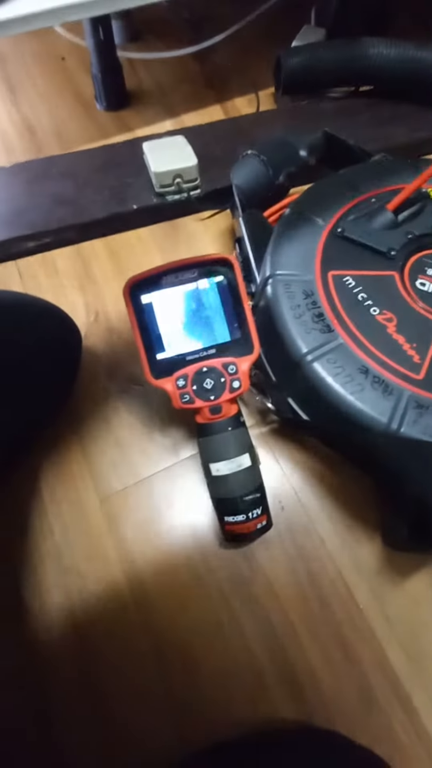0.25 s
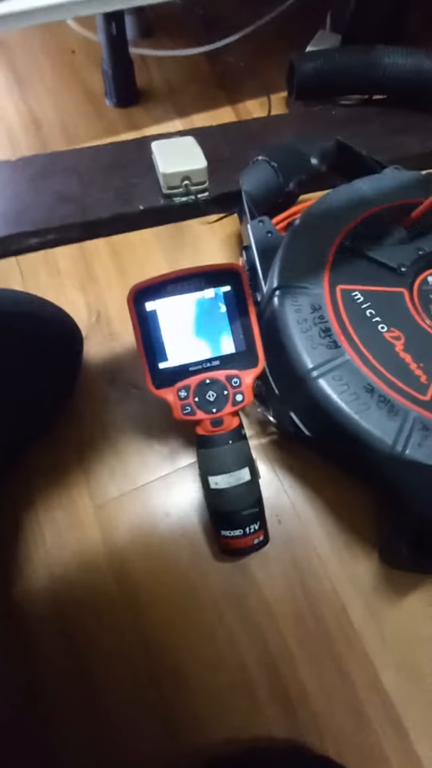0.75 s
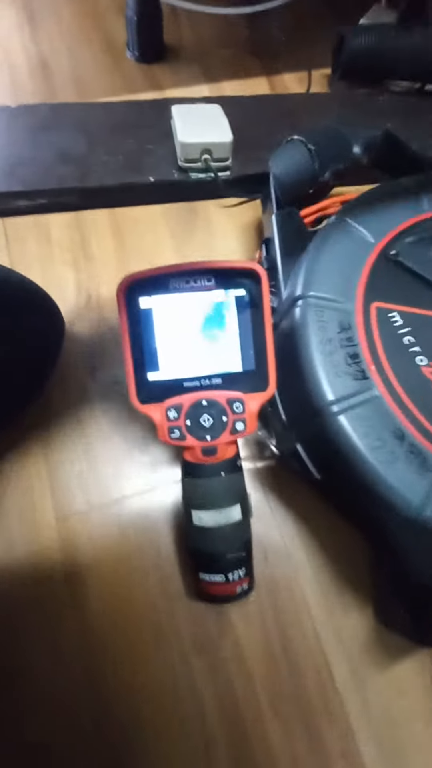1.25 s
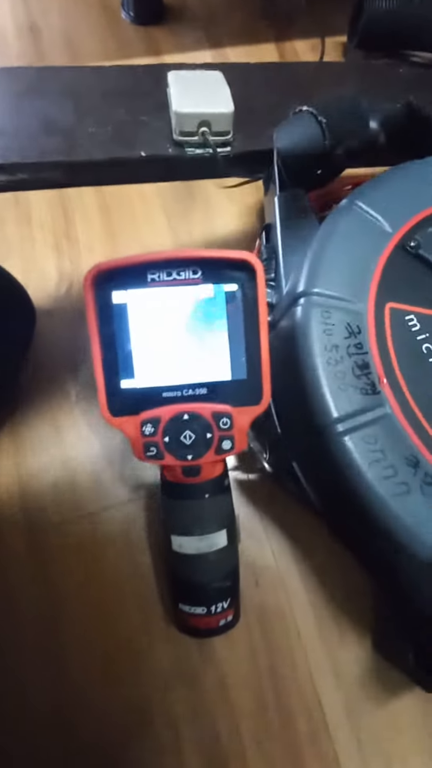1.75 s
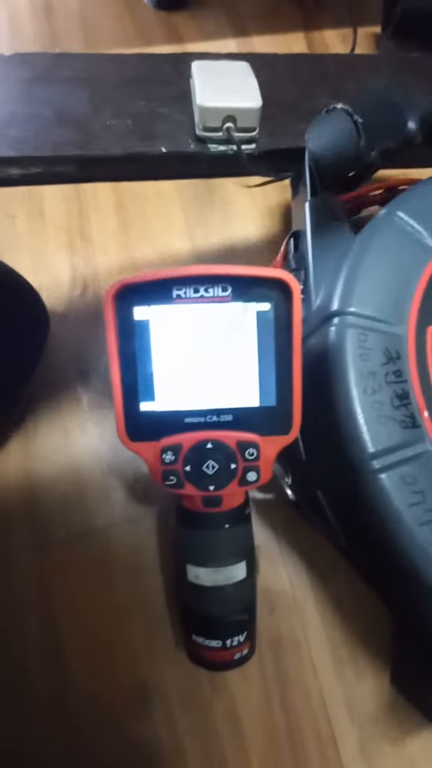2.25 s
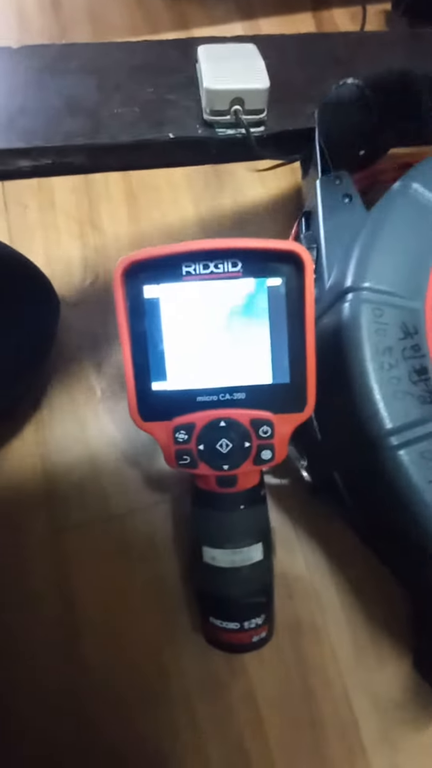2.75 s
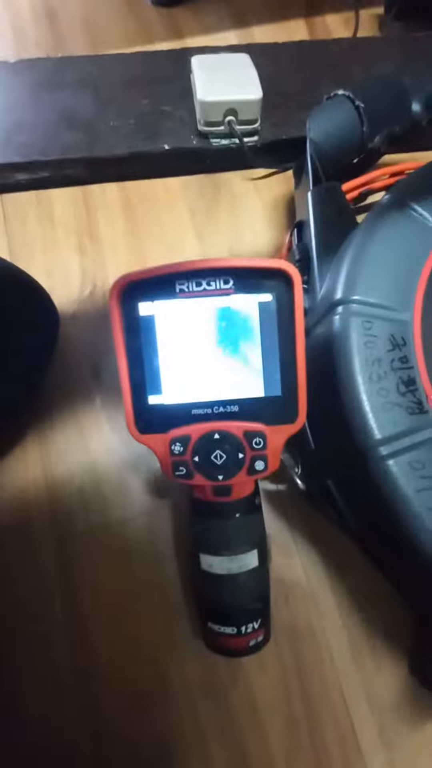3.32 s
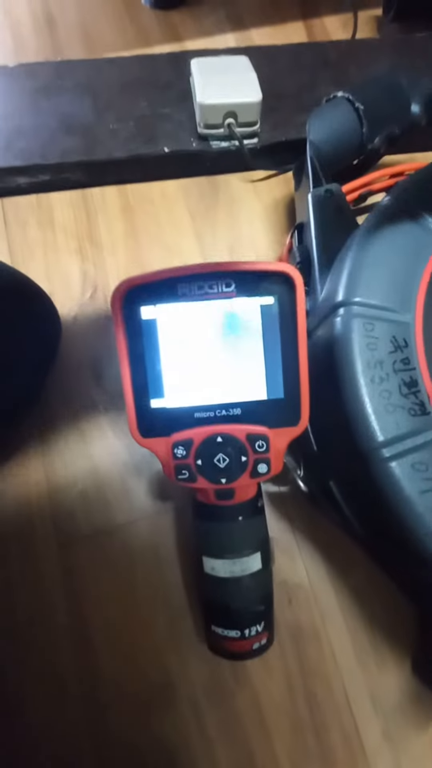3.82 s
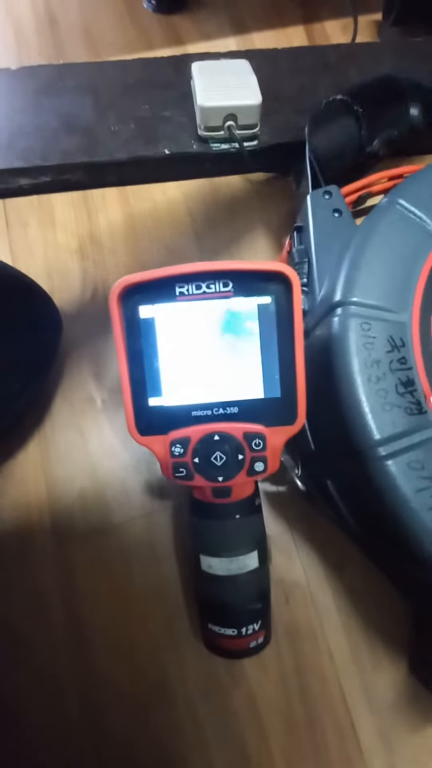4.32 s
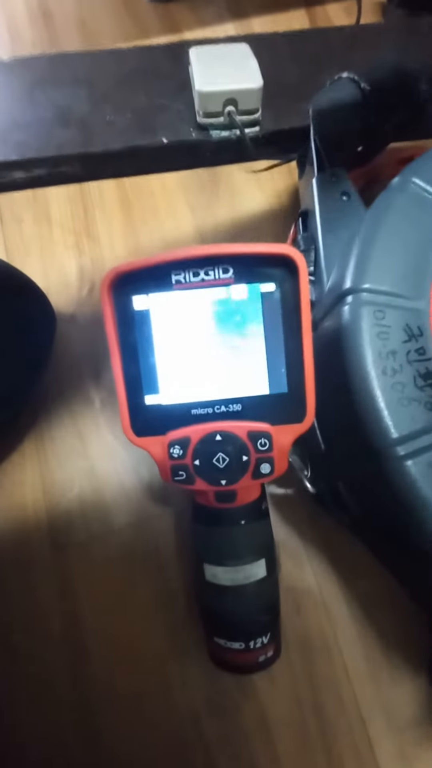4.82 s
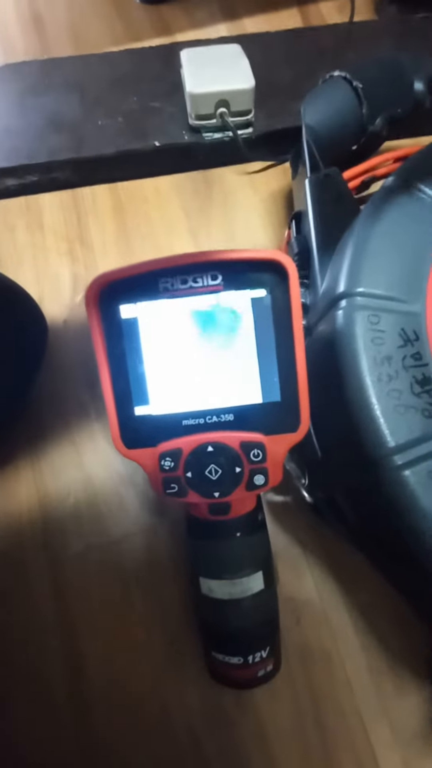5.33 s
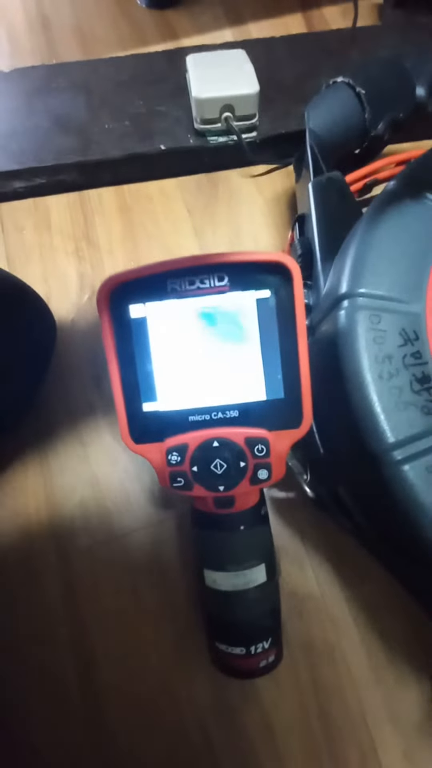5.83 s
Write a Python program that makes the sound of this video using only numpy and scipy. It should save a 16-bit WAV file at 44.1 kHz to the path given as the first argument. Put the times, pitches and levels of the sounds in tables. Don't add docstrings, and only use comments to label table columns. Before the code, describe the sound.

A phone held near a cable reel on floorboards picks up continuous hissing, faintly humming drain water. Hollow low bumps cluster early with rattling wall slaps and gritty friction, pause briefly, then return in another hard push. The later part is quieter, mostly water with weak rubs and isolated bumps, a small group of slaps near the end, then a drop that bounces out in quick fading taps.

```python
import sys
import numpy as np
from scipy import signal
from scipy.fft import rfft, irfft
from scipy.io import wavfile
from scipy.ndimage import uniform_filter1d

SR = 44100
rng = np.random.default_rng(int(sys.argv[2]) if len(sys.argv) > 2 else 0)


def magnitude_from_level(level_db):
    exponent = np.asarray(level_db, float) / 20
    return 10 ** exponent


def put_to_file(sound):
    columns = np.atleast_2d(sound).T
    safe = np.clip(columns, -1, 1)
    whole_steps = np.round(safe * 32767)
    wavfile.write(sys.argv[1], SR, whole_steps.astype(np.int16))


N = 268117

# t/s, peak level/dB, cavity pitch f/Hz
LURCHES = [(0.544, -24.5, 215), (0.672, -27, 252), (0.718, -18.5, 232), (0.797, -15, 206), (0.847, -8, 209),
           (0.905, -10, 242), (0.921, -17, 238), (1.051, -12, 227), (1.135, -32, 217), (1.461, -26, 195),
           (1.495, -19.5, 206), (1.526, -19.5, 208), (1.561, -12, 213), (1.831, -20, 207),
           (1.866, -15, 203), (1.911, -11, 198), (1.947, -16, 224), (2.003, -8, 204), (2.074, -24, 211),
           (2.113, -17, 184.3), (2.478, -27, 217), (3.335, -24.5, 193), (3.723, -27, 216),
           (4.618, -28.5, 270), (4.735, -27, 215), (4.767, -19.5, 320), (4.954, -25, 217),
           (5.153, -22.5, 202), (5.317, -29, 230), (5.39, -25.5, 205)]
# t/s, peak level/dB, cavity pitch f/Hz
REBOUNDS = [
    (0.963, -17, 254),
    (0.983, -14, 250),
    (1.075, -23, 216),
    (1.09, -17, 235),
    (2.029, -19, 198),
    (5.519, -26, 270),
]
# t/s, peak level/dB, low mode f/Hz, high mode f/Hz, low-mode level/dB
SLAPS = [(0.654, -24, 530, 1180, -18), (0.697, -19.5, 610, 1270, -1.5), (0.794, -11, 593, 1120, 0.5),
         (0.887, -27.5, 513, 1170, 14), (1.104, -31, 610, 1230, -9), (1.507, -14.5, 623, 1154, -7.5),
         (1.557, -19.5, 570, 1300, -18), (1.885, -33, 560, 1150, 4), (1.942, -18, 510, 1300, -1),
         (2.001, -24, 488, 1260, 7.5), (2.05, -24, 497, 990, -4), (2.115, -17, 498, 1420, -3),
         (2.142, -27, 544, 1490, -10), (4.03, -25, 630, 1530, -6), (4.719, -32, 544, 1130, -2),
         (4.734, -23, 695, 1190, -8), (4.770, -16, 599, 1250, -4)]
# f/Hz, t60/s, level/dB, left-port lead/rad, left minus right/dB
CAVITY_MODES = [
    (201.2, 0.25, 2.5, .05, 2),
    (224, 0.21, -2.5, .05, 2),
    (248, 0.086, 2.5, .1, -3),
    (279, 0.022, -5.5, .15, -4),
    (312.5, 0.19, -7, 0.25, -9),
]
# f/Hz, width/Hz, level/dB, port likeness/0-1
WALL_MODES = [
    (432, 92, -2, 0.1),
    (530, 134, 3.5, 0.54),
    (697, 145, 2, 0.28),
    (1152, 680, 3.5, 0.19),
    (1970, 680, 2.5, 0),
]
# full effort t/s, build-up/s, hold/s, let-go/s, effort level/dB
EFFORTS = [(0.75, 0.16, 0.15, .3, -21), (0.86, 0.13, 0.23, 0.25, -18), (1.49, 0.26, 0.09, 0.088, -28.5),
           (1.87, 0.2, 0.24, 0.055, -18.5), (2.44, 0.38, 0.071, 0.18, -31),
           (3.01, 0.33, 0.013, 0.043, -37.5), (3.2, 0.39, 0.19, 0.23, -40), (3.76, 0.36, .1, 0.082, -30),
           (4.2, 0.38, 0.056, 0.42, -42), (4.73, 0.057, 0.034, 0.15, -31), (4.97, 0.18, 0.032, .2, -31.5),
           (5.31, 0.13, 0.065, 0.13, -31), (5.45, 0.033, 0.083, 0.2, -33), (5.9, 0.16, 0.061, 0.062, -43)]
# full contact t/s, build-up/s, hold/s, let-go/s, rubbing level/dB
RUBS = [
    (0.75, .15, .38, 0.15, -36.5),
    (1.51, 0.05, 0.085, 0.036, -38.5),
    (1.87, 0.17, 0.27, 0.062, -36),
    (2.47, 0.58, .03, .15, -46.5),
    (3.72, 0.23, 0.15, 0.042, -40.5),
    (4.61, .02, 0.015, 0.035, -44),
    (4.74, 0.033, 0.043, .04, -39),
    (4.98, 0.19, .03, 0.12, -45),
    (5.32, 0.13, 0.026, 0.11, -39.5),
    (5.45, 0.065, 0.047, 0.24, -40),
]
# t/s, level/dB
SKID_EVENTS = [
    (0.775, -31),
    (0.994, -40),
    (1.04, -38),
    (1.091, -29),
    (1.104, -32),
    (1.882, -32),
    (1.92, -35),
    (2.115, -41),
    (3.78, -40),
]
# t/s, level/dB
WATER_LEVEL = [
    (0.0, -38),
    (0.71, -38),
    (0.86, -38.5),
    (1.12, -40.5),
    (2.73, -40.5),
    (3.37, -39.5),
    (3.86, -38),
    (5.4, -39),
    (6.08, -38.5),
]
# f/Hz, level/dB per Hz
WATER_SPECTRUM = [(24, -66), (40, -38), (62, -14), (111, 3), (147, -6.5), (281, -10), (361, -7.5),
                  (440, -7.5), (475, -8.5), (657, -6.5), (1000, -13), (1790, -11), (2600, -14), (7420, -12),
                  (12900, -10), (15700, -13.5)]
# f/Hz, left minus right/dB
WATER_BALANCE = [(60, 0), (110, -1), (200, -0.5), (380, -2.5), (700, 3.5), (1290, -4), (2380, -2),
                 (4400, 8.5), (8120, 2.5), (15000, 11)]
# f/Hz, likeness/0-1
WATER_LIKENESS = [(60, 0.92), (130, 0.96), (290, 0.87), (640, 0), (1410, -0.11), (3100, 0), (6820, 0.01),
                  (15000, -0.0)]
# f/Hz, width/Hz, left level/dB, right level/dB
PIPE_MODES = [
    (136, 26, -61.5, -69),
    (281.7, 18, -52, -49),
    (603, 78, -60, -53.5),
    (716, 11, -63, -57),
    (857, 40, -56, -53),
    (1790, 90, -72, -53),
    (4430, 140, -78, -55),
    (7380, 1100, -46.5, -57),
]

T_S = np.arange(N) / SR
PORTS = np.array([[1], [-1]])
HIT_LEN = 8192


def table(points, hz):
    f, v = np.transpose(points)
    return np.interp(np.log(hz), np.log(f), v)


def unit(x):
    return x / np.sqrt(np.mean(np.abs(x) ** 2))


def ring(x, hz, t60_s):
    pole = np.exp(2j * np.pi * hz / SR - np.log(1000) / (t60_s * SR))
    return signal.lfilter([1], [1, -pole], x)


def pair(alike):
    alike = np.clip(alike, -1, 1)
    mid, side = rng.standard_normal((2, N))
    return np.sqrt((1 + alike) / 2) * mid + np.sqrt((1 - alike) / 2) * side * PORTS


def band(x, hz, width_hz):
    f = np.fft.rfftfreq(N, 1 / SR)
    return irfft(rfft(x) / (1 + ((f - hz) / width_hz * 2) ** 2), N)


def walk(rate_hz):
    k = int(SR / rate_hz)
    steps = np.repeat(rng.standard_normal(N // k + 1), k)
    wander = uniform_filter1d(uniform_filter1d(steps, k), k)[:N]
    return unit(wander - uniform_filter1d(wander, 4 * k))


def sides(pan_db):
    return magnitude_from_level(PORTS * pan_db / 2)


def add_hit(out, s, hit):
    i = int(s * SR)
    out[:, i:i + HIT_LEN] += hit[:, :N - i]


def cavity(push, low_hz=152.4, top_hz=384.0):
    out = 0
    for hz, t60_s, db, lead_rad, pan_db in CAVITY_MODES:
        z = ring(push, hz, t60_s) * magnitude_from_level(db) / np.sqrt(t60_s)
        out = out + sides(pan_db) * np.imag(z * np.exp(0.5j * lead_rad * PORTS))
    return signal.sosfilt(signal.butter(3, [low_hz, top_hz], "band", fs=SR, output="sos"), out)


def even_pulses(start_s=5.446, peak_db=-15, pitch_hz=230, gap_s=0.023, loss_db=2.3):
    return [(start_s + k * gap_s, peak_db - k * loss_db, pitch_hz) for k in range(4)]


def bumps(lurch_t60_s=0.1, rebound_t60_s=0.058, push_s=0.0022, note_db=-4, shell_db=-9):
    out = np.zeros((2, N))
    push = np.zeros(HIT_LEN)
    k = int(push_s * SR)
    push[:k] = np.hanning(k)
    shell = cavity(push)
    shell = magnitude_from_level(shell_db) * shell / np.abs(shell).max()
    hits = [(*row, lurch_t60_s) for row in LURCHES]
    hits += [(*row, rebound_t60_s) for row in list(REBOUNDS) + even_pulses()]
    for s, db, hz, t60_s in hits:
        note = np.imag(ring(ring(push, hz, t60_s), hz, 0.13 * t60_s))
        add_hit(out, s, magnitude_from_level(db) * (magnitude_from_level(note_db) * note / np.abs(note).max() + shell))
    return out


def knocks(t60_low_s=0.11, t60_high_s=0.029, rattle_s=0.00019, high_db=-1, gain_db=-5, pan_db=-2.5):
    out = np.zeros((2, N))
    decay = np.exp(-np.arange(HIT_LEN) / SR / rattle_s)
    for s, db, low_hz, high_hz, low_db in SLAPS:
        contact = (1 + 0.5 * rng.standard_normal(HIT_LEN)) * decay
        contact[0] += 8.0
        low = ring(contact, low_hz, t60_low_s)
        low = low - ring(contact, 1.214 * low_hz, 0.43 * t60_low_s)
        high = 1.5 * ring(contact, high_hz, t60_high_s)
        high = high - 0.51 * ring(contact, 0.9 * high_hz, t60_high_s)
        high = high - 0.85 * ring(contact, 1.24 * high_hz, 0.79 * t60_high_s)
        low = low / np.abs(low).max() * magnitude_from_level(low_db)
        high = high / np.abs(high).max() * magnitude_from_level(high_db)
        hit = np.imag(low * np.exp(0.55j * PORTS) + high * np.exp(0.75j * PORTS))
        add_hit(out, s, magnitude_from_level(db + gain_db) * hit * sides(pan_db))
    return out


def effort(rows, rest_db):
    moves = []
    for s, rise_s, hold_s, fall_s, db in rows:
        corners_s = [s - rise_s, s, s + hold_s, s + hold_s + fall_s]
        moves.append(np.interp(T_S, corners_s, [rest_db, db, db, rest_db]))
    return np.max(moves, axis=0)


def skids(decay_s=0.0089):
    return sum(magnitude_from_level(db) * (T_S >= s) * np.exp(-np.abs(T_S - s) / decay_s) for s, db in SKID_EVENTS)


def rumble(push_db, rate_hz=1600, spread_db=1.0, gain_db=-2.0):
    chance = rng.random((2, N))
    size = magnitude_from_level(-spread_db * np.log(chance[1] + 1e-9)) * rng.standard_normal(N)
    slips = (chance[0] < rate_hz / SR) * size
    return cavity(slips * magnitude_from_level(push_db)) / np.std(cavity(slips)) * magnitude_from_level(gain_db)


def boards(push_db, thud_db=-24):
    return unit(band(pair(0.83), 97.0, 36.0)) * magnitude_from_level(push_db + thud_db)


def rubbing(rest_db=-49):
    out = 0
    for hz, width_hz, db, alike in WALL_MODES:
        mode = unit(band(pair(alike), hz, width_hz))
        out = out + mode * magnitude_from_level(db + walk(22.07)) * sides(table(WATER_BALANCE, hz))
    return out * magnitude_from_level(effort(RUBS, rest_db))


def scrape(push_db, level_db=-40.5, growth_db_per_db=1.7, slack_db=-51):
    gain = magnitude_from_level(level_db + growth_db_per_db * (push_db + 20.5)) + magnitude_from_level(slack_db) + skids()
    return unit(band(pair(0.05), 2970.0, 3800.0)) * gain * magnitude_from_level(1.5 + 2.2 * walk(140))


def drag(rest_db=-51.5, grit_db=1.0):
    push_db = effort(EFFORTS, rest_db)
    grit = magnitude_from_level(grit_db * walk(45) - 7)
    return rumble(push_db) + boards(push_db) + (rubbing() + scrape(push_db)) * grit


def spray(share_db=0.32, spray_db=0.42, flicker_db=1.65):
    f = np.fft.rfftfreq(N, 1 / SR)[1:]
    spectrum = magnitude_from_level(table(WATER_SPECTRUM, f))
    out, swell, splash = 0, walk(50), walk(60)
    for k in range(27):
        centre_hz = 40 * 2 ** (k / 3)
        window = np.cos(np.pi / 2 * np.clip(3 * np.log2(f / centre_hz), -1, 1))
        noise = pair(table(WATER_LIKENESS, centre_hz))
        sheet = irfft(rfft(noise) * np.r_[0, window * spectrum], N)
        sway_db = share_db * swell + spray_db * splash * min(centre_hz / 4000, 1)
        sway_db = sway_db + flicker_db * min(1, (2500 / centre_hz) ** 0.5) * walk(30)
        out = out + sheet * sides(table(WATER_BALANCE, centre_hz)) * magnitude_from_level(sway_db)
    return unit(out) * magnitude_from_level(4.5)


def pipe_hum(base_db=-41):
    out = 0
    for hz, width_hz, left_db, right_db in PIPE_MODES:
        hum = unit(band(pair(table(WATER_LIKENESS, hz)), hz, width_hz))
        hum = hum * magnitude_from_level(2.7 * min(900 / hz, 1) * walk(7.6))
        out = out + hum * magnitude_from_level(np.array([[left_db], [right_db]]) - base_db)
    return out


def water():
    s, db = np.transpose(WATER_LEVEL)
    return (spray() + pipe_hum()) * magnitude_from_level(np.interp(T_S, s, db))


def scene():
    return bumps() + knocks() + drag() + water()


def roll_off(x):
    return signal.sosfilt(signal.butter(12, 15850, fs=SR, output="sos"), x)


def record(dry):
    thin = signal.sosfilt(signal.butter(5, 60.0, "high", fs=SR, output="sos"), dry)
    return roll_off(thin)


dry = scene()
out = record(dry)
put_to_file(out)
```